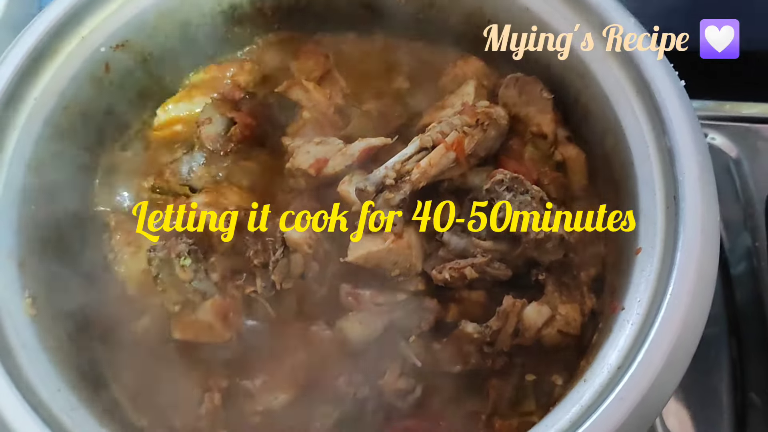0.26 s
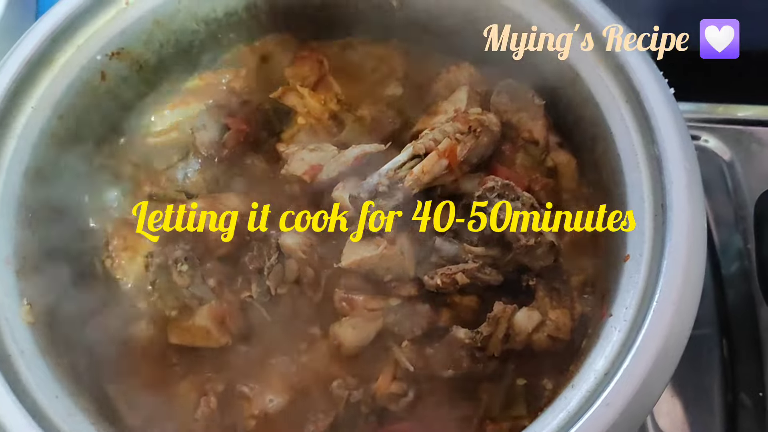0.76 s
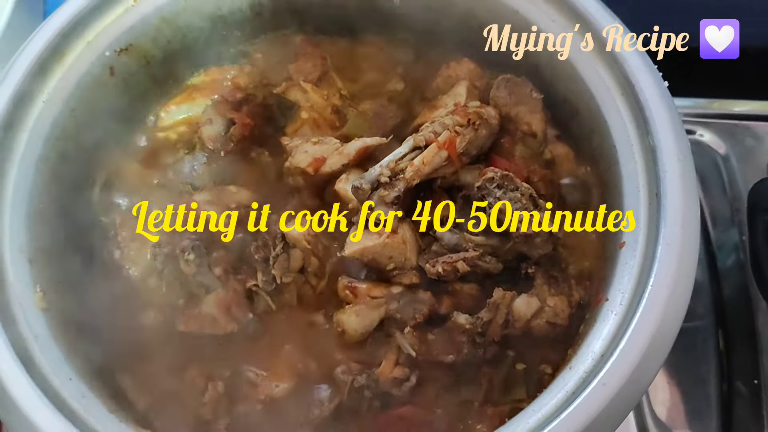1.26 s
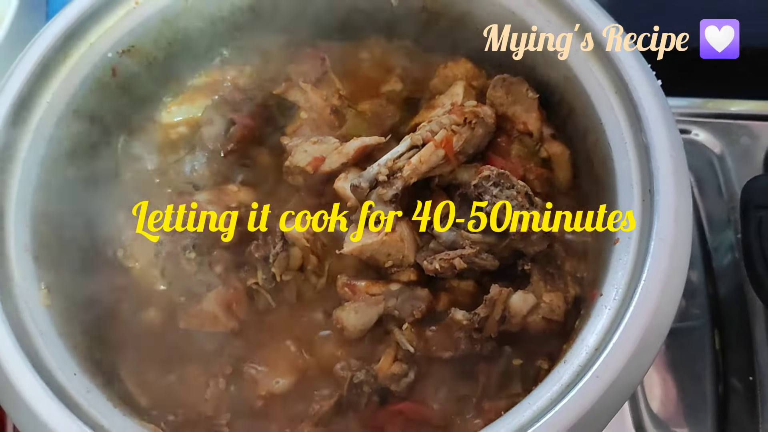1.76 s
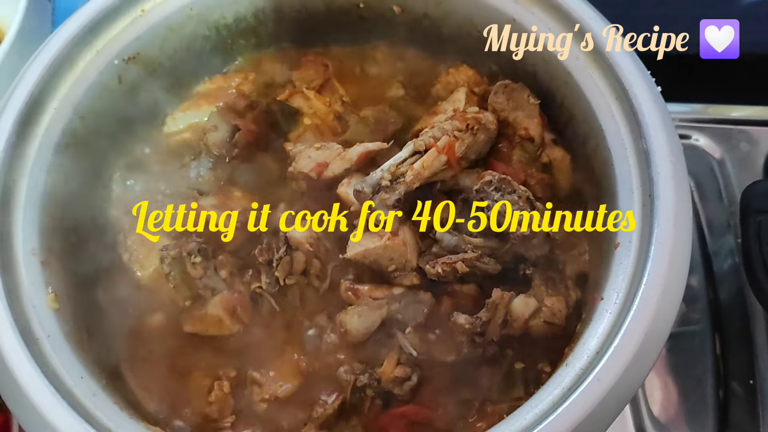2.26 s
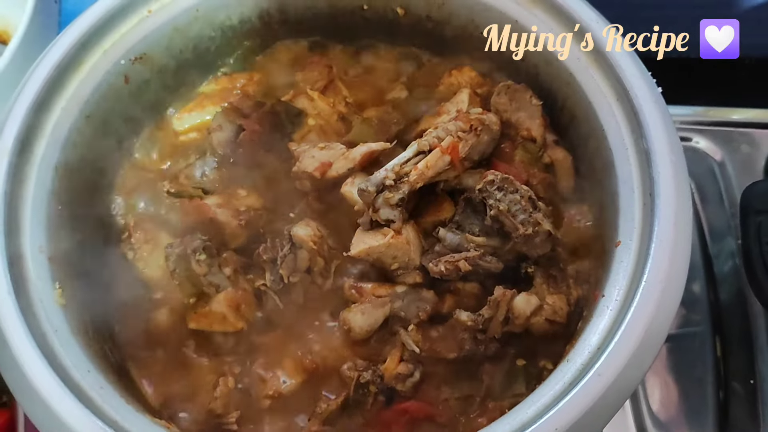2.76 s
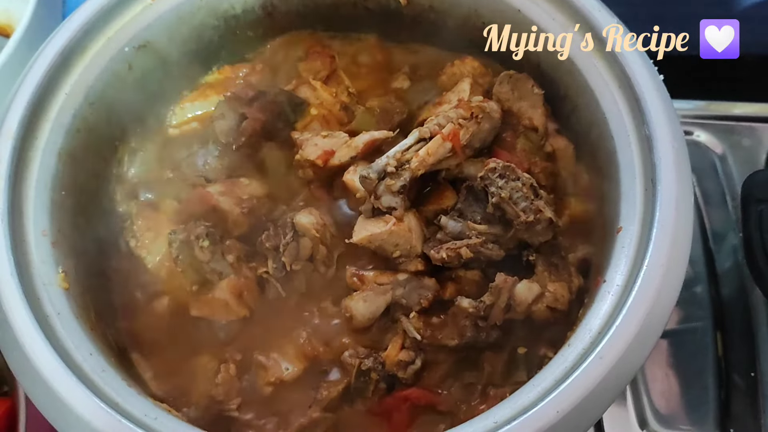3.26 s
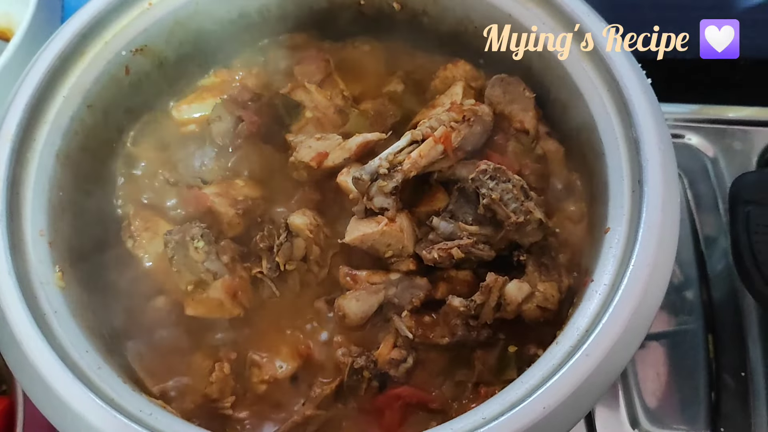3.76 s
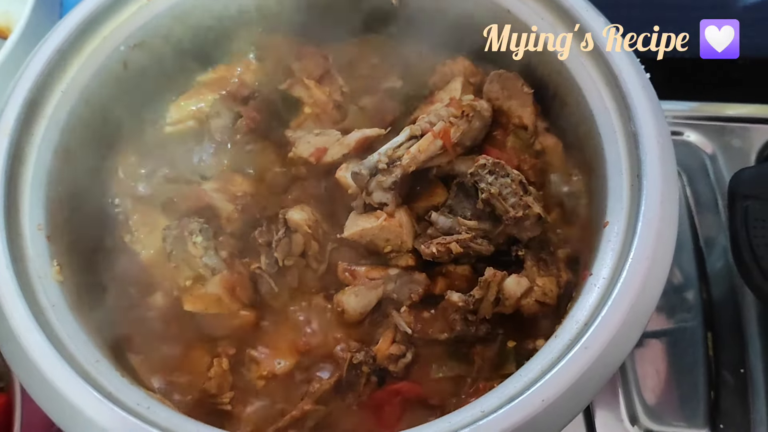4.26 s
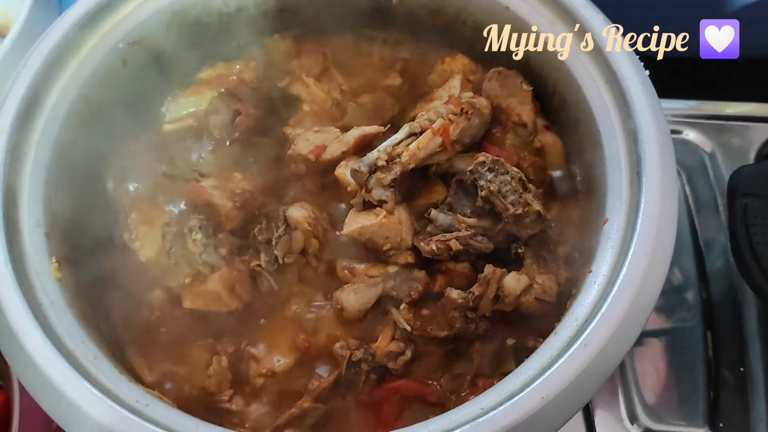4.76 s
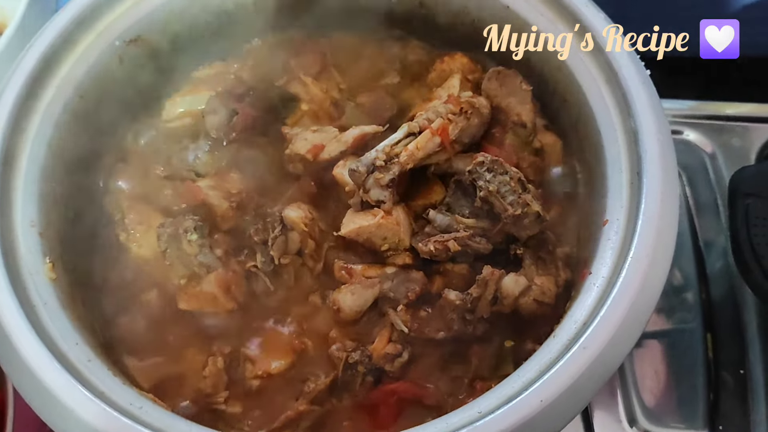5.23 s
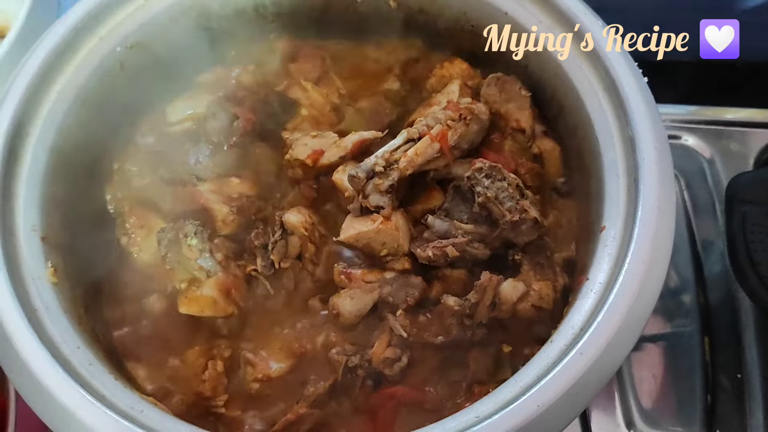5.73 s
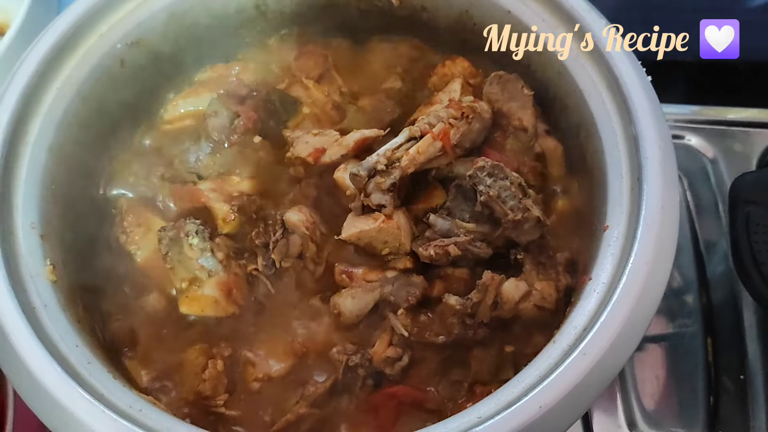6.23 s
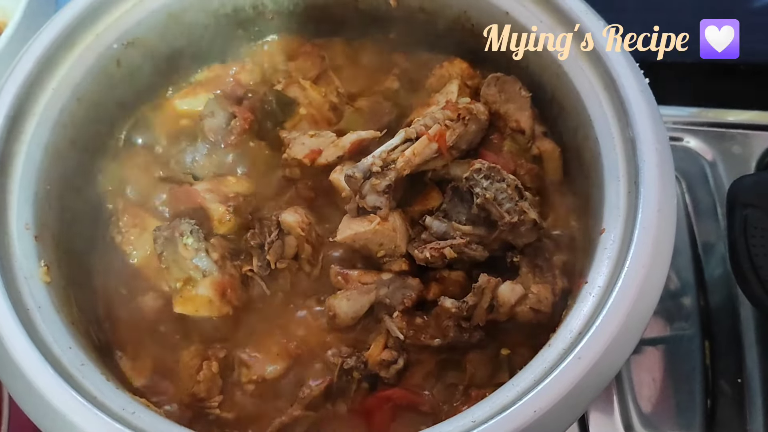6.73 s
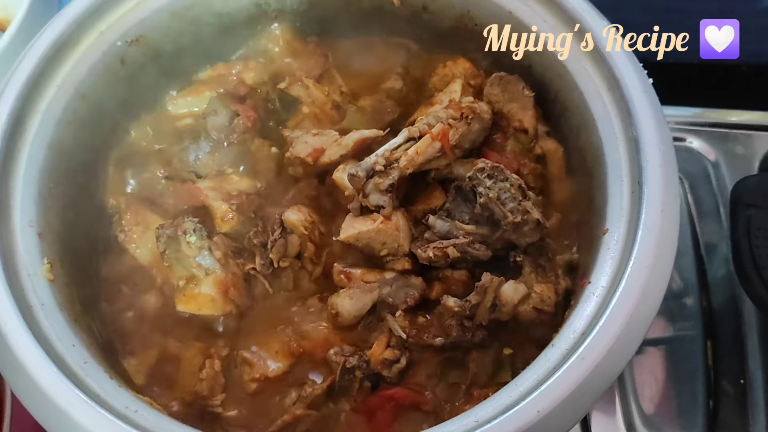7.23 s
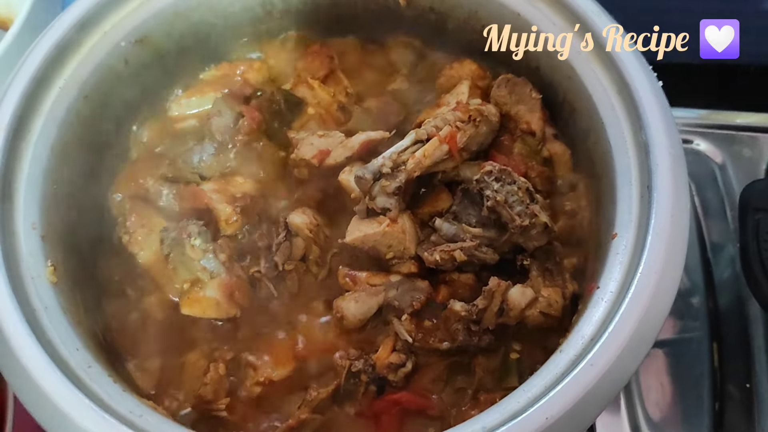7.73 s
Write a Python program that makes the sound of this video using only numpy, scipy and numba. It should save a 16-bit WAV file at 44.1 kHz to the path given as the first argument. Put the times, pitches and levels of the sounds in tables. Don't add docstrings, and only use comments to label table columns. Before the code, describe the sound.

From 0 s thick sauce is already boiling hard in an open metal pot, heard by close stereo microphones just above it. Irregular hollow pops, mostly mid-pitched with a slight upward glide, burst over crowded small bubbles, deep gulps, wet skin tears and tiny bright ticks. The gas flame rumbles low and hisses steadily; steam eddies thud softly against either side, strongest near 1.1 s. From about 2 to 3.2 s a bright steam jet hisses at the rim, with drops spitting at 2.8 s. A faint squeak comes at 3.2 s, then a hard, short metallic crack at 3.8 s. A sharp sizzle at 4.6 s and a longer soft one at 5.1 s follow. Around 5.6-5.75 s a second layer of boil fades in, making bubbling and hiss fuller until 8 s. Short kitchen reflections, no silence.

```python
import sys
import numpy as np
from scipy import signal
from scipy.fft import rfft, irfft, next_fast_len
from scipy.io import wavfile
from scipy.ndimage import uniform_filter1d
from numba import njit

SR = 44100
rng = np.random.default_rng(int(sys.argv[2]) if len(sys.argv) > 2 else 0)


def to_linear_factor(level_db):
    exponent = np.asarray(level_db, float) / 20
    return 10 ** exponent


def output_pcm(signal):
    pcm = np.clip(np.atleast_2d(signal).T, -1, 1) * 32767
    wavfile.write(sys.argv[1], SR, np.round(pcm).astype(np.int16))


N = 352359

# [time_s, level_db]
JET = [
    (1.9, -86),
    (2.05, -61),
    (2.4, -51),
    (2.75, -52.5),
    (3.08, -51),
    (3.14, -60),
    (3.6, -94),
]


def level(x, db):
    return x * to_linear_factor(db) / np.sqrt(np.mean(x ** 2))


@njit
def rings(start, hz, peak, rise, glide):
    out = np.zeros(N)
    for k in range(len(start)):
        phase, step = 0., 2 * np.pi * hz[k] / SR
        for j in range(int(6 * rise[k])):
            i = int(start[k] - rise[k]) + j
            u = j / rise[k]
            phase += step * (1 + glide[k] * (u - 1))
            if 0 <= i < N:
                out[i] += peak[k] * (u * np.exp(1 - u)) ** 2 * np.sin(phase)
    return out


def bubbles(s, hz, db, cycles, glide):
    return rings(s * SR, 1. * hz, to_linear_factor(db), np.maximum(cycles, .1) * SR / hz, glide + 0 * s)


def band(x, hz, width_hz):
    return signal.lfilter(*signal.iirpeak(hz, hz / width_hz, SR), x)


def butter(x, order, hz, kind):
    return signal.lfilter(*signal.butter(order, hz, kind, fs=SR), x)


def noise_band(order, low_hz, high_hz):
    sos = signal.butter(order, [low_hz, high_hz], "bandpass", fs=SR, output="sos")
    return signal.sosfilt(sos, rng.standard_normal(N))


def walk(rate):
    k = int(SR / rate)
    held = np.repeat(rng.standard_normal(N // k + 1), k)[:N]
    return 1.2 * uniform_filter1d(uniform_filter1d(held, k), k)


def coloured(points, x):
    hz, db = np.transpose(points)
    size = next_fast_len(N)
    f = np.arange(1, size // 2 + 2) * SR / size
    gain = to_linear_factor(np.interp(np.log(f), np.log(hz), db))
    return level(irfft(rfft(x, size) * gain, size)[..., :N], 0)


def swarm(count, mid_hz, octaves, scatter_db, cycles, clump_db):
    place, chance = rng.random((count, 2)).T
    pitch, length = rng.standard_normal((count, 2)).T
    hz = np.clip(mid_hz * 2 ** (octaves * pitch), 80, .4 * SR)
    db = np.minimum(-np.log(1 - chance), 2.6) * scatter_db
    crowd = bubbles(place * N / SR, hz, db, cycles * 2 ** (0.42 * length), 0.092)
    return level(crowd * to_linear_factor(clump_db * walk(21.934)), 0)


def kitchen(x, t60):
    t = np.arange(SR // 4) / SR
    tail = rng.standard_normal((3, len(t)))
    tail = level((tail[0] + 0.42 * tail[1:]) * to_linear_factor(-60 * t / t60), 0) / np.sqrt(len(t))
    return signal.fftconvolve(x[None], tail, axes=1)[:, :N]


def burner(deep_db, hiss_db):
    # [pitch_hz, level_db per Hz]
    rumble_spectrum = [
        (41, 10),
        (70, -3),
        (167, 3),
        (231, -8.5),
        (300, 3),
        (411, -10),
        (780, -23.5),
        (1320, -120),
    ]
    # [pitch_hz, level_db per Hz]
    hiss_spectrum = [
        (1060, 11.5),
        (3330, -0.5),
        (4730, -6.5),
        (6850, -9.5),
        (10600, -14.5),
        (13400, -18.5),
        (14600, -15),
        (15600, -74),
    ]
    sign = np.array([[1], [-1]])
    mid, side = rng.standard_normal((2, N))
    rumble = to_linear_factor(deep_db + 2.5 + 2.0 * walk(12)) * coloured(rumble_spectrum, mid + 0.2 * sign * side)
    mid, side = rng.standard_normal((2, N))
    side = butter(side, 2, 5000, "high")
    flutter_db = 2.2 * walk(9)
    hiss = to_linear_factor(hiss_db + 6.5 + flutter_db) * coloured(hiss_spectrum, mid + 0.063 * sign * side)
    t = np.arange(N) / SR
    jet = butter(rng.standard_normal((2, N)), 2, [4000, 15000], "bandpass")
    jet *= to_linear_factor(np.interp(t, *np.transpose(JET)))
    whistle = to_linear_factor(-55) * band(rng.standard_normal((2, N)), 10400, 200) * (t > 3.0)
    return rumble + jet + whistle + hiss


def fizz(hiss_db):
    mid, left, right = (swarm(count=2200, mid_hz=7000, octaves=.6, scatter_db=3.7, cycles=1.3, clump_db=1.2)
                        for _ in range(3))
    out = to_linear_factor(-3.5) * (mid + 0.22 * np.array([left, right]))
    for hz, width_hz, db in [(6870, 2000, -4.5), (11700, 5600, -8.0)]:
        air = rng.standard_normal((3, N))
        puffs = level(band(air[0] + 3.1 * air[1:], hz, width_hz), db)
        out += puffs * to_linear_factor(5.5 * walk(150))
    out = butter(out, 3, 13600, "low")
    return to_linear_factor(hiss_db + np.array([[0.6], [-0.6]])) * out


def eddies(table):
    t, out = np.arange(N) / SR, np.zeros(N)
    for s, db, rise_ms in table:
        i = slice(max(int((s - .2) * SR), 0), int((s + .3) * SR))
        u = (t[i] - s) / (rise_ms / 1000 * 0.5)
        u = np.where(u > 0, u / 1.28, u)
        out[i] += to_linear_factor(db + 5.0) * u * np.exp(-u ** 2 / 2)
    busy = uniform_filter1d(np.abs(out), size=9000)
    slow = level(noise_band(3, 6, 19), 0)
    out += slow * (to_linear_factor(-38.0 + 4.7 * walk(3.56)) + 0.18 * busy)
    flutter = level(band(rng.standard_normal(N), 64, 30), 0)
    out += flutter * (to_linear_factor(-51) + 0.019 * busy)
    return butter(out, 1, 4.0, "high")


def droplets():
    # [start_s, peak_db, pitch_hz]
    ticks = [(0.3905, -33, 6400), (0.5085, -28, 7600), (0.6605, -33, 6800), (0.795, -27, 5390),
             (0.8252, -32, 3460), (1.328, -29, 6740), (1.3837, -27, 7100), (1.2015, -36, 3770),
             (2.0054, -31, 6350), (2.062, -27, 8800), (1.571, -39, 3200), (2.5934, -28, 5250),
             (2.7801, -19, 8200), (2.797, -29, 3980), (3.9084, -33, 6800), (4.2636, -33, 9310),
             (4.4592, -28, 7200), (4.5932, -22, 5250), (4.7122, -33, 5300), (4.9434, -29.5, 6260),
             (1.4548, -33, 4570), (5.1717, -29, 6220), (5.2901, -28, 12470), (5.3248, -31, 3000),
             (6.5644, -36, 5770), (6.7181, -29.5, 6160), (7.1804, -30.5, 7400), (7.6674, -27, 5600),
             (0.1198, -26, 3300), (7.944, -33.5, 3680)]
    # [start_s, peak_db, pitch_hz]
    faint_ticks = [(0.0198, -43, 3160.0), (0.2336, -40, 4150), (0.3163, -40, 7550), (0.4697, -43.0, 6990.0),
                   (0.6216, -45, 4010.0), (0.6348, -44, 5130), (0.6547, -43, 4150), (1.2529, -48, 4240),
                   (1.2966, -38, 7700), (1.3143, -45, 4000.0), (1.4726, -42, 5050), (1.9451, -40, 6320.0),
                   (1.9804, -39, 6020.0), (2.1655, -54, 6070), (3.2548, -41, 5610.0), (3.5507, -39, 9400),
                   (3.5975, -44.5, 4650), (3.7653, -40, 10370.0), (3.8051, -39, 3240),
                   (4.2542, -41.5, 5620.0), (4.4888, -43, 7220.0), (4.6863, -43, 5390.0),
                   (4.7532, -40, 3000), (5.2226, -44, 5060.0), (5.4206, -43.0, 7060.0), (5.4971, -38, 9000),
                   (5.646, -43, 3930), (6.5145, -40.0, 6360), (6.5889, -42, 5240), (6.6844, -41, 3360)]
    # [start_s, crack_db, sizzle_db, sizzle_t60_s]
    spits = [
        (2.7791, -19, -19, 0.015),
        (2.795, -17.5, -21, 0.014),
        (3.8122, -2, -29.5, 0.025),
        (4.59, -58, -11, 0.0056),
        (5.082, -51, -30, 0.16),
    ]
    # [pitch_hz, level_db, t60_s]
    rim = [
        (2930, 8, 0.002),
        (5860, -3.5, 0.0058),
        (2030, -14, 0.0078),
        (3680, -6, 0.0032),
        (4270, -22, 0.0061),
    ]
    faint_lift_db = 8.5
    s, db, hz = np.vstack([ticks, np.add(faint_ticks, [0, faint_lift_db, 0])]).T
    out = bubbles(s, hz, db - 4.5, 2.85, 0.)
    out += bubbles(np.array([3.218]), np.array([3210]), np.array([-52]), 85, 0.)
    t = np.arange(SR // 4) / SR
    crack = sum(to_linear_factor(db - 60 * t / t60) * np.sin(2 * np.pi * f * t) for f, db, t60 in rim)
    crack *= 1 - np.exp(-(t / 0.00027) ** 2)
    crack = butter(crack, 2, 1100, "high")
    spray = noise_band(2, 1500, 11000)
    swell = 1 - np.exp(-t / 0.0015)
    for s, crack_db, sizzle_db, t60 in spits:
        i = int(s * SR)
        sizzle = to_linear_factor(sizzle_db - 60 * t / t60) * swell * spray[i:i + len(t)]
        out[i:i + len(t)] += to_linear_factor(crack_db - 1.5) * crack + sizzle
    return out


def pockets():
    # [start_s, peak_db, pitch_hz]
    pocket_pops = [(0.1769, -24.5, 804), (0.3341, -13, 960), (0.7872, -21.5, 785), (0.8971, -20.5, 850),
                   (1.1376, -19, 790), (2.1954, -21, 770), (2.3288, -19.5, 850), (2.5884, -21, 815),
                   (2.7075, -18, 810), (3.0214, -22, 730), (3.6244, -23.5, 610), (3.7952, -22, 760),
                   (4.0736, -21.5, 760), (4.1361, -23.5, 780), (4.3362, -25, 820), (4.3796, -21.5, 800),
                   (5.3272, -15.5, 810), (5.348, -20, 740), (5.5746, -25.5, 835), (5.6752, -18, 860),
                   (5.7512, -16.5, 840), (6.1128, -21, 804), (6.5922, -20.5, 830), (6.7897, -18.5, 810),
                   (7.844, -34, 850), (7.569, -20, 850), (7.7445, -11.5, 690), (7.8102, -24, 704),
                   (7.895, -30, 770), (7.9778, -17, 667),
                   (0.018, -21, 960), (0.2698, -18.5, 970), (0.368, -19.5, 900), (0.641, -17.5, 960),
                   (0.937, -20, 980), (1.0633, -15.5, 1140), (1.995, -21.5, 920), (2.343, -18, 950),
                   (2.559, -19.5, 1050), (2.7617, -15, 1080), (2.881, -20, 970), (3.073, -21, 1170),
                   (3.2205, -21, 955), (3.2313, -21, 1080), (3.5496, -15, 1030), (3.964, -20, 925),
                   (4.245, -21, 990), (4.312, -18.5, 940), (4.775, -22.5, 970), (5.1246, -24, 930),
                   (5.2318, -17.5, 1102), (6.1372, -17.5, 1060), (6.3694, -20, 975), (6.4134, -12, 903),
                   (6.597, -25, 920), (6.685, -22, 908), (6.714, -22, 1015), (7.0921, -21.5, 940),
                   (7.4172, -20, 1080), (7.4328, -15, 1000),
                   (0.0091, -23, 1300), (0.1114, -13, 1170), (0.12, -11, 1280), (0.4085, -21, 1590),
                   (0.5213, -23.5, 1110), (0.6458, -21.5, 1420), (1.1238, -17, 2540), (2.355, -20, 1300),
                   (2.585, -26, 1470), (2.955, -21.5, 1450), (3.0142, -25, 1400), (3.094, -22, 1190),
                   (3.929, -25, 1210), (3.9717, -16, 1250), (4.036, -24.5, 1370), (4.2358, -18, 1280),
                   (4.4234, -18.5, 1140), (4.7174, -14, 1210), (4.8, -18.5, 1550), (4.863, -22, 1650),
                   (5.0524, -22, 1150), (5.6563, -28.5, 1370), (6.2612, -19, 1620), (6.877, -21, 1570),
                   (6.9933, -22.5, 1300), (7.278, -21.5, 1410), (7.5093, -31, 1243), (7.5136, -23, 1580),
                   (7.7908, -29, 1210), (7.8926, -24, 2480)]
    # [start_s, peak_db]
    skin_tears = [(0.018, -28), (0.119, -24), (0.3656, -22), (0.8836, -24), (0.994, -18.5), (1.596, -25),
                  (1.995, -25.5), (2.3264, -25), (2.7807, -25), (4.2, -26), (4.3804, -23), (4.629, -21),
                  (4.714, -22), (4.728, -24), (5.087, -23), (5.325, -24), (5.349, -26), (5.38, -19.5),
                  (5.706, -24), (1.203, -37), (6.8107, -26), (6.876, -37.5), (7.376, -20), (7.511, -41.5),
                  (7.7425, -21)]
    # [start_s, peak_db, pitch_hz]
    lesser_blips = [(0.0195, -21, 1040), (0.1648, -37, 1100.0), (0.2092, -35, 1060.0), (0.2805, -34, 1100),
                    (0.3059, -30, 1000), (0.3254, -27, 780), (0.3522, -37, 870.0), (0.489, -46, 1060.0),
                    (0.5276, -29, 1210), (0.5878, -29, 1500), (0.6024, -27.5, 960), (0.6916, -27.5, 790.0),
                    (0.7371, -25, 1330), (0.7949, -29, 1010), (0.8761, -35, 870.0), (0.8833, -25.5, 1070),
                    (0.9118, -32, 740), (0.9231, -27.0, 860.0), (0.9297, -23, 930), (1.1015, -25, 1430),
                    (1.1142, -25, 885), (1.1767, -24, 765), (1.248, -24, 875), (1.3401, -29, 1230),
                    (1.367, -27.5, 850.0), (1.5503, -28, 790), (1.5884, -26, 806), (1.6737, -27.0, 1020),
                    (1.6799, -38, 830.0), (1.6949, -36, 1400.0), (1.7001, -35, 1620.0),
                    (1.8723, -30.0, 1040), (1.8979, -33.0, 754), (1.9049, -35, 850.0), (1.9222, -31, 790.0),
                    (1.9485, -28.5, 850.0), (1.9622, -27, 1090), (1.9715, -28, 1210), (2.0445, -27.5, 900),
                    (2.2047, -26, 980), (2.2853, -27.5, 700.0), (2.3501, -26, 960), (2.4276, -38, 960.0),
                    (2.443, -23, 1080.0), (2.4668, -32, 870.0), (2.4932, -25, 1080.0), (2.5194, -27, 850.0),
                    (2.5255, -32, 950.0), (2.8377, -32, 1250), (2.8589, -32, 750.0), (2.8943, -29, 950.0),
                    (3.0615, -23, 1000), (3.2685, -28, 1000), (3.405, -25, 1000), (3.4249, -28.5, 1150),
                    (3.4673, -23.5, 1000), (3.5344, -27.0, 760.0), (3.5407, -39, 726), (3.5679, -22, 860),
                    (3.5811, -44, 1020.0),
                    (3.603, -31, 780.0), (3.617, -33, 735), (3.648, -30, 1080.0), (3.7398, -35, 940.0),
                  (3.8047, -31, 950.0), (3.835, -32, 2150), (3.889, -30.5, 720), (3.9529, -28, 880),
                  (4.008, -30.0, 960.0), (4.015, -31, 730.0), (4.0238, -41, 860.0), (4.0796, -24, 840),
                  (4.0987, -31, 790.0), (4.1021, -25, 925), (4.1563, -30, 790), (4.1827, -24.5, 850),
                  (4.2011, -22.5, 860), (4.2566, -25, 1120), (4.33, -23, 920.0), (4.3438, -23, 866),
                  (4.374, -26, 1250), (4.4875, -28, 1060), (4.515, -30.5, 850.0), (4.5202, -36, 805),
                  (4.5261, -31, 760), (4.5917, -26.5, 1300), (4.667, -33, 940.0), (4.6868, -25.0, 990),
                  (4.694, -30, 1270), (4.742, -26, 970), (4.7692, -32, 920), (3.288, -30, 2430),
                  (4.9661, -27, 810), (4.9845, -33, 1050), (5.01, -29, 1270), (5.0332, -34, 980),
                  (5.1246, -37, 920), (5.1427, -34, 840.0), (5.2193, -30, 860.0), (5.281, -26.5, 830.0),
                  (5.4007, -31, 1110.0), (5.508, -25.5, 1200), (5.5666, -23, 910), (5.6393, -25, 845),
                  (5.803, -22, 1150), (5.9094, -35, 993), (6.0342, -29, 940), (6.3895, -27.0, 1200),
                  (6.5096, -25.5, 920), (6.6984, -24, 950.0), (6.7649, -32, 850), (6.8584, -22, 920.0),
                  (7.0913, -35, 980), (7.1944, -25, 1280), (7.2506, -27, 1207), (7.5087, -33, 1280.0),
                  (7.651, -32, 885), (7.658, -29, 840), (7.792, -30, 1184), (7.911, -30, 890.0)]
    skin_hz, skin_spread, blip_lift_db = 1905, 0.053, 2.5
    tear_hz = skin_hz * (1 + skin_spread * rng.standard_normal(len(skin_tears)))
    skins = np.vstack([np.transpose(skin_tears), tear_hz]).T
    blips = np.array(lesser_blips) + [0, blip_lift_db, 0]
    return np.vstack([pocket_pops, skins, blips]).T


def stir(s, db):
    marks = np.bincount((s * SR).astype(int), to_linear_factor(db), N)
    bumps = uniform_filter1d(uniform_filter1d(marks, size=700), size=700)
    return np.minimum(bumps / bumps.mean(), 2.2)


def sauce(small_db, deep_db):
    # [start_s, peak_db, pitch_hz]
    gulps = [(0.162, -25, 151), (0.454, -30.5, 307), (0.634, -27, 184), (0.3, -29, 125), (1.744, -26, 150),
             (2.172, -24.5, 294), (2.324, -35, 301), (2.578, -26, 270), (2.658, -27, 127),
             (3.007, -29.5, 296), (3.071, -28.5, 155), (3.248, -29, 297), (3.428, -26, 301),
             (3.527, -26, 280), (3.781, -24.5, 276), (4.175, -29, 158), (4.304, -26.5, 174),
             (4.307, -25.5, 330), (4.946, -25.5, 288), (1.87, -26, 111), (5.32, -22.5, 180),
             (5.618, -27, 158), (6.105, -26, 150), (6.809, -32, 158), (6.881, -20.5, 142.4),
             (7.02, -22.5, 147), (7.738, -22, 125.3)]
    # [pitch_hz, width_hz, level_db]
    pot = [
        (288, 90, -6.5),
        (483, 560, -13.5),
        (690, 62, -1),
        (850, 108, -6.5),
        (1080, 153, -7.5),
        (1512, 160, 0.5),
        (2050, 640, -6.5),
    ]
    pop_glide = 0.051
    s, db, hz = pockets()
    length, climb, film, delay, slap = rng.standard_normal((len(s), 5)).T
    pops = bubbles(s, hz, db - 2.5, 1.03 * 2 ** (0.2 * length), pop_glide * (1 + 0.69 * climb))
    pops += bubbles(s + 0.00219 * 2 ** (0.75 * delay), hz * 1.17 * 2 ** (0.41 * slap), db - 11.5, 1.19, 0.)
    pops += bubbles(s, (1500 + 0.76 * hz) * 2 ** (0.14 * film), db - 16.5 + 2.2 * climb, 1.3, 0.)
    pops += bubbles(s, hz * 1.9, db - 16, 1.81, pop_glide)
    pops = butter(pops, 2, 380, "high")
    churn = stir(s, db)
    small = swarm(count=2600, mid_hz=950, octaves=0.5, scatter_db=3.5, cycles=0.84, clump_db=2.5)
    small *= to_linear_factor(small_db - 8.5 + 2.34 * (churn - 1.5))
    deep = swarm(count=1200, mid_hz=192.5, octaves=0.72, scatter_db=6.0, cycles=0.965, clump_db=-0.5)
    deep *= to_linear_factor(deep_db - 4.5 + 5.4 * (churn - 0.5))
    gulp_s, gulp_db, gulp_hz = np.transpose(gulps)
    gulping = bubbles(gulp_s + 0.0046, gulp_hz, gulp_db - 4.0, 1.19, 0.026)
    liquid = small - pops + deep + gulping
    return to_linear_factor(-4.0) * liquid + sum(to_linear_factor(db) * band(liquid, f, w) for f, w, db in pot)


def scene():
    # [time_s, level_db]
    boil = [(0.0, -40.5), (0.44, -39.5), (1.07, -38), (1.29, -41.5), (2.22, -41.5), (2.98, -36.5),
            (3.85, -40), (4.18, -37.5), (4.43, -41.5), (4.87, -36.5), (5.14, -35), (5.5, -40), (5.81, -36),
            (6.54, -41.5), (6.76, -36.5), (7.25, -40), (7.52, -34.5), (7.99, -35)]
    # [time_s, swing_db, rise_ms]
    eddies_left = [(-0.015, -14, 38), (0.083, -4.5, 16), (0.161, -15, 12), (0.22, -14, 25),
                   (0.73, -22.5, 32), (1.117, -2, 21), (1.193, -12, 29), (1.266, -10.5, 19),
                   (1.355, -13.5, 28), (1.784, -15, 32), (2.16, -27, 49), (2.586, -16, 15),
                   (2.623, -19, 25), (3.75, -22, 45), (4.353, -11.5, 71), (4.411, -21, 120),
                   (4.64, -19, 28), (5.114, -12, 21.5), (5.325, -18, 40), (5.352, -15.5, 9.6),
                   (5.396, -13.5, 24), (5.665, -18, 19), (5.744, -9.5, 30), (6.06, -17, 15),
                   (6.085, -24, 7.6), (6.119, -17, 15), (6.2, -17.5, 21), (6.414, -6, 16), (6.715, -21, 33),
                   (6.89, -19, 28), (6.99, -19, 25), (7.095, -20, 20), (7.16, -12, 53), (7.28, -21, 60),
                   (7.34, -18, 19), (7.392, -8, 19), (7.527, -13, 17), (7.65, -31, 19)]
    eddies_right = [(-0.012, -15, 22), (0.052, -7.5, 24), (0.101, -7.5, 10.7), (0.134, -12, 15),
                    (0.149, -7.5, 17), (0.242, -16, 26), (0.956, -10.5, 18), (1.1, -0.5, 13.5),
                    (1.227, -13.5, 36), (1.295, -27, 33), (1.738, -17, 22), (2.128, -16.5, 29),
                    (2.584, -9, 31), (2.673, -20, 31), (3.464, -20, 21), (4.287, -9, 12), (4.315, -5.5, 20),
                    (4.382, -20, 38), (4.999, -11, 17), (5.034, -17, 17), (5.331, -15, 16),
                    (5.361, -10, 17), (5.587, -17.5, 25), (5.674, -14.5, 12.4), (5.713, -6, 21),
                    (6.032, -16, 9.1), (6.054, -5.5, 16), (6.385, -12, 13), (6.6, -24, 21), (6.73, -17, 26),
                    (6.85, -19.5, 24), (6.96, -19, 28), (7.073, -19.5, 18), (7.117, -7, 20),
                    (7.265, -17.5, 24), (7.341, -6.5, 24), (7.49, -22, 14), (7.685, -28, 34)]
    t = np.arange(N) / SR
    vigour_db = np.interp(t, *np.transpose(boil))
    jet = to_linear_factor(np.interp(t, *np.transpose(JET)))
    swell_db = vigour_db - vigour_db.mean()
    small_db = vigour_db + 6
    deep_db = -44.5 + 0.3 * swell_db
    hiss_db = -56.5 + 0.24 * swell_db + 4 * jet / jet.max()
    low, high = sauce(small_db, deep_db), droplets()
    tilt = 0.024 * band(low, 2600, 2000) + 0.072 * np.roll(band(low, 1440, 1000), 70)
    near = low * to_linear_factor(np.array([[.15], [-.15]])) + tilt * np.array([[1], [-1]])
    near += np.array([np.roll(high, 1), to_linear_factor(-1.0) * high])
    sauce_tail = to_linear_factor(-9.0) * kitchen(low, 0.14)
    rim_tail = to_linear_factor(-6.5) * kitchen(butter(high, 2, 4800, "low"), 0.055)
    take = near + sauce_tail + rim_tail + burner(deep_db, hiss_db) + fizz(hiss_db)
    steam = np.array([eddies(eddies_left), eddies(eddies_right)])
    push = uniform_filter1d(np.abs(steam).max(axis=0), size=900)
    take = take / (1 + .7 * push) + steam
    replay_lag = 116578
    return take + np.roll(take, replay_lag, axis=1) * np.clip(1 + (t - 5.75) / 0.19, 0, 1)


def roll_off(x):
    return signal.sosfilt(signal.butter(12, 15720, fs=SR, output="sos"), x)


def record(dry):
    cut = signal.ellip(8, .2, 60, 15700, fs=SR, output="sos")
    mix = signal.sosfilt(cut, np.clip(dry, -1, 1))
    return roll_off(mix)


dry = scene()
out = record(dry)
output_pcm(out)
```